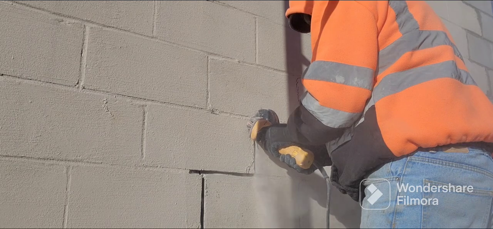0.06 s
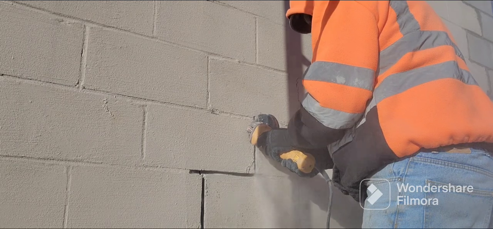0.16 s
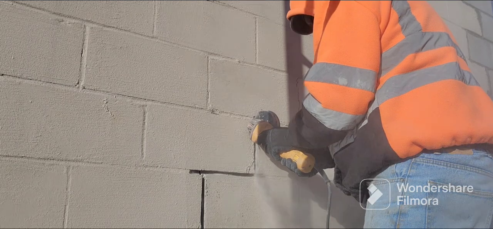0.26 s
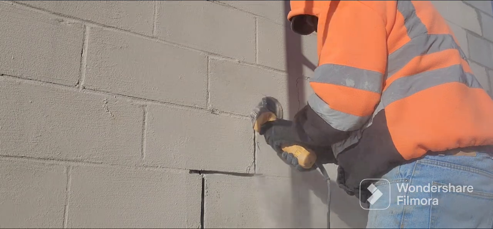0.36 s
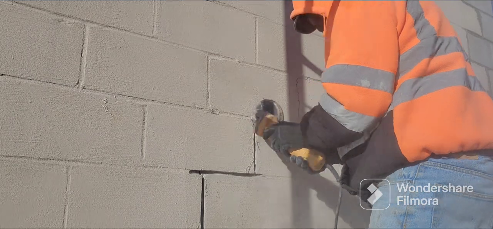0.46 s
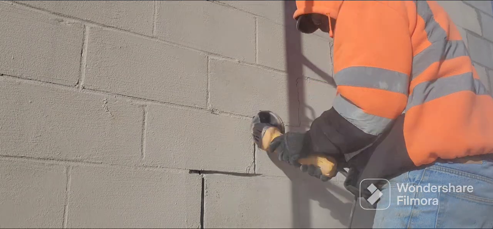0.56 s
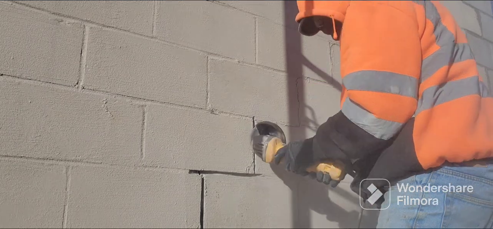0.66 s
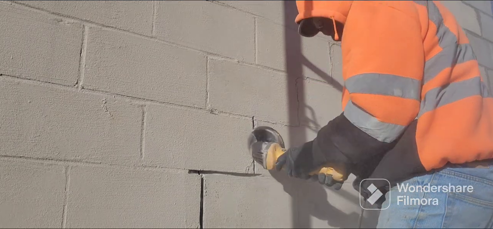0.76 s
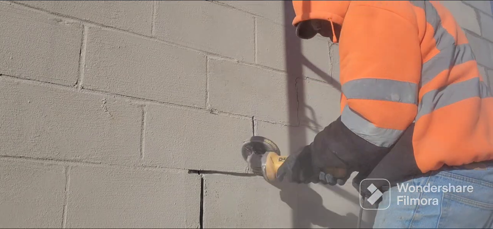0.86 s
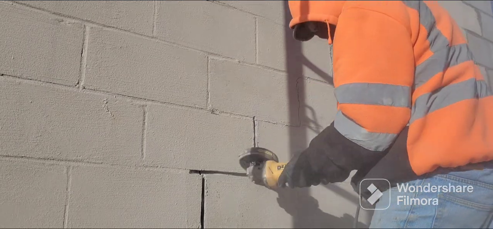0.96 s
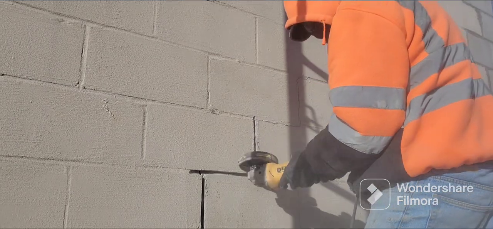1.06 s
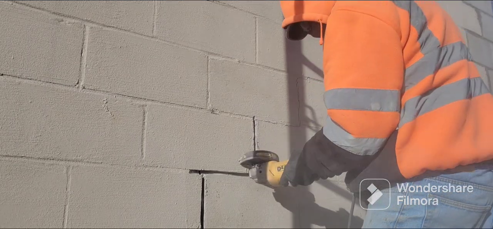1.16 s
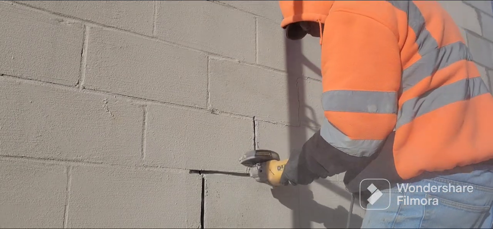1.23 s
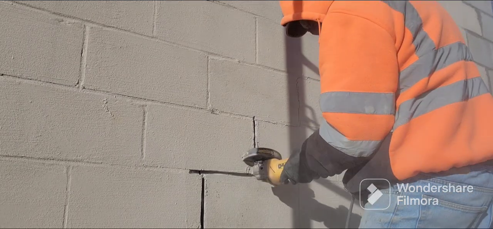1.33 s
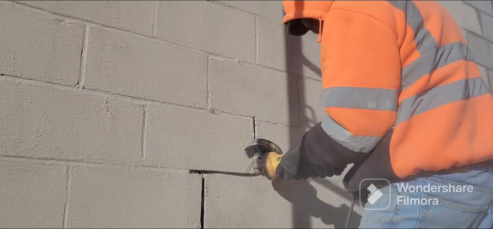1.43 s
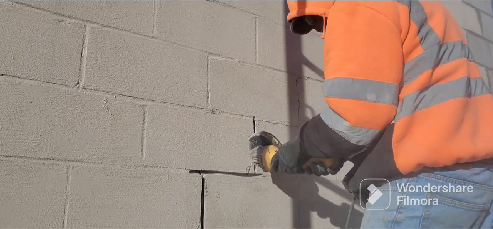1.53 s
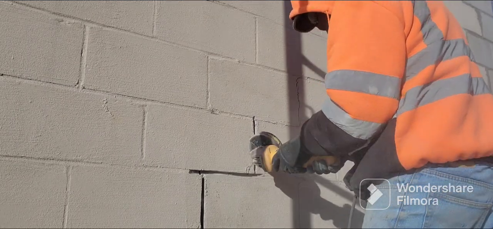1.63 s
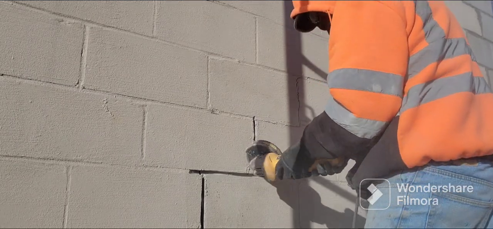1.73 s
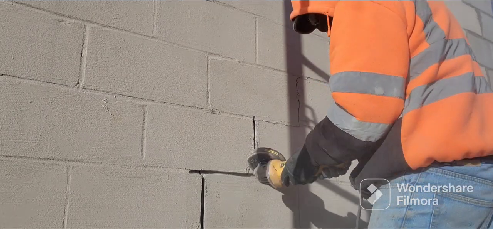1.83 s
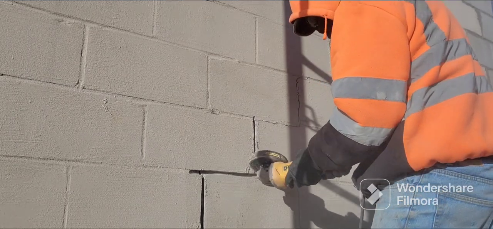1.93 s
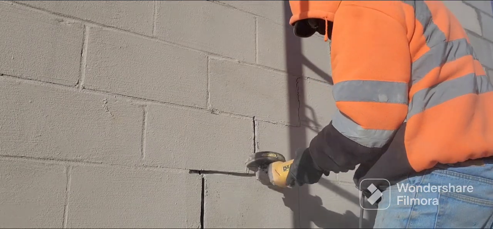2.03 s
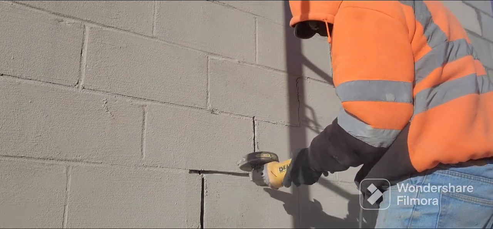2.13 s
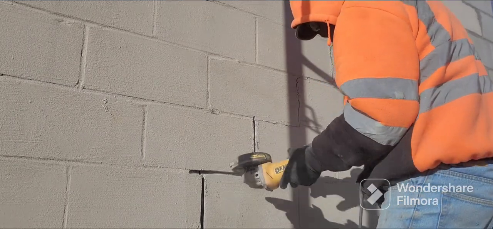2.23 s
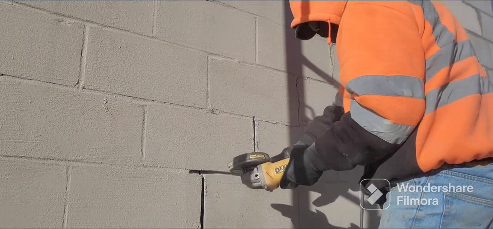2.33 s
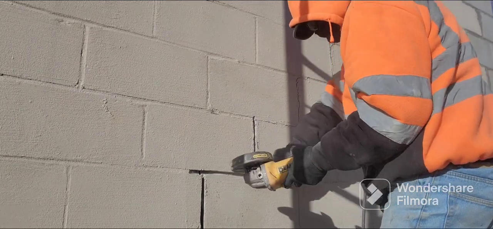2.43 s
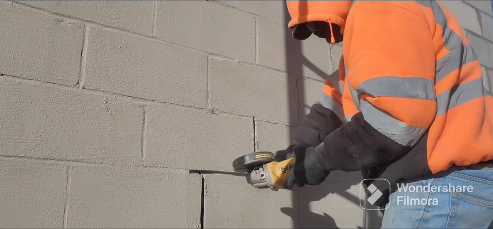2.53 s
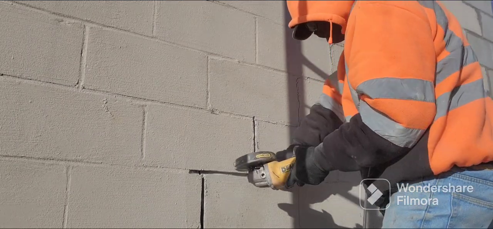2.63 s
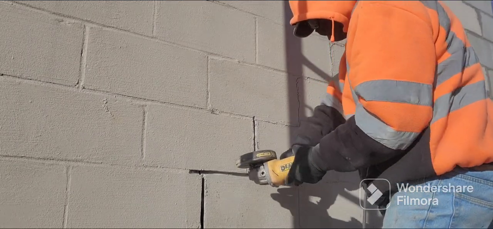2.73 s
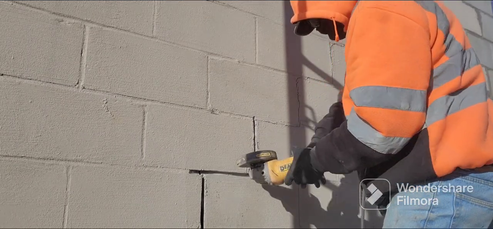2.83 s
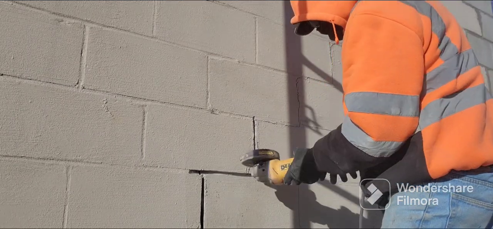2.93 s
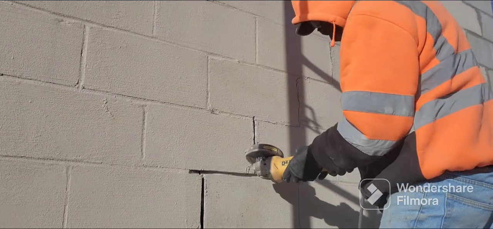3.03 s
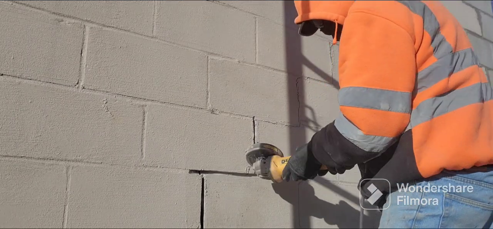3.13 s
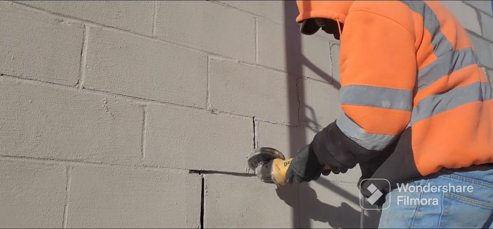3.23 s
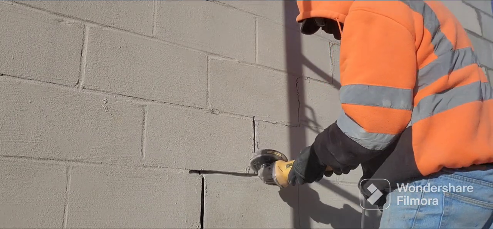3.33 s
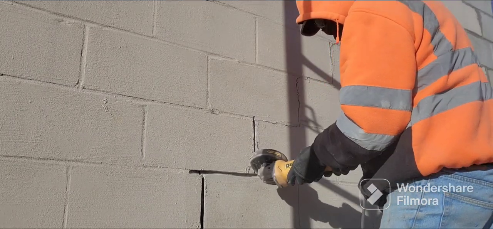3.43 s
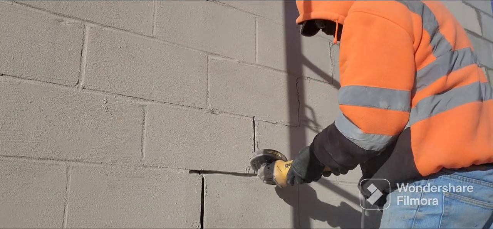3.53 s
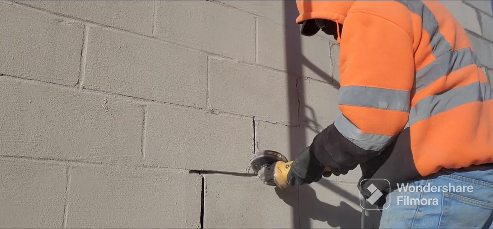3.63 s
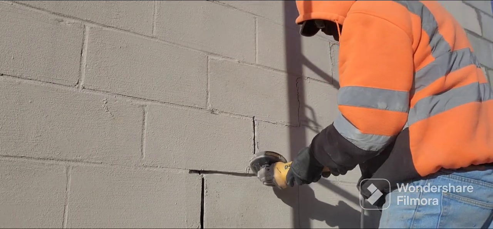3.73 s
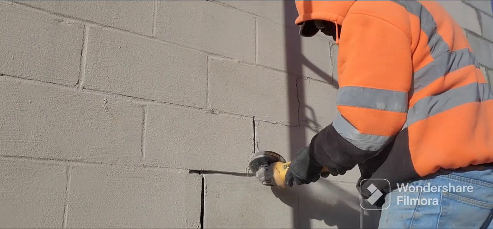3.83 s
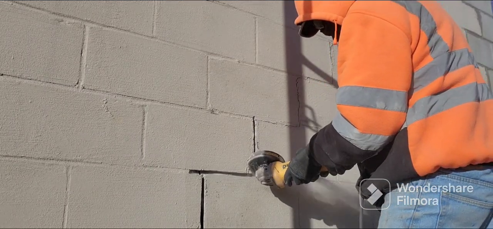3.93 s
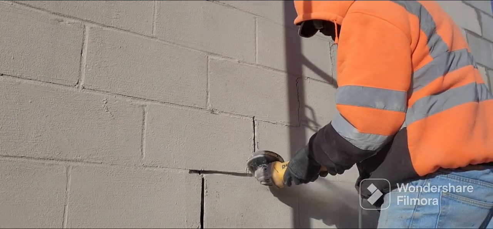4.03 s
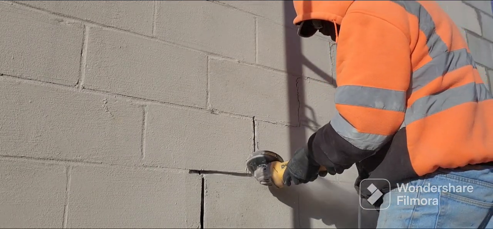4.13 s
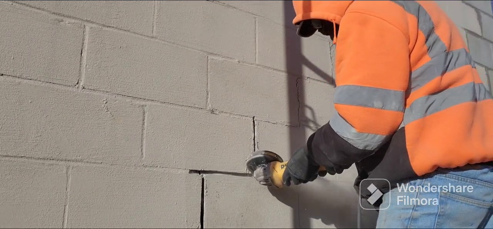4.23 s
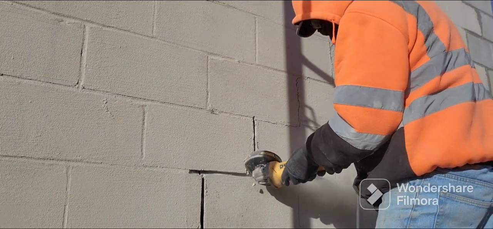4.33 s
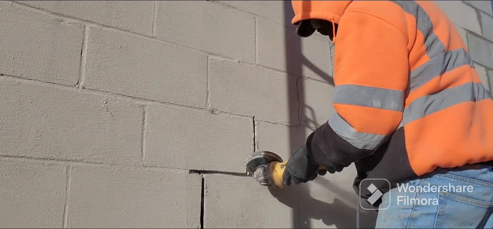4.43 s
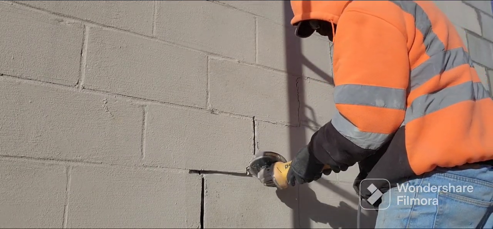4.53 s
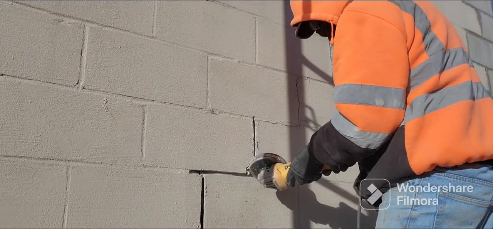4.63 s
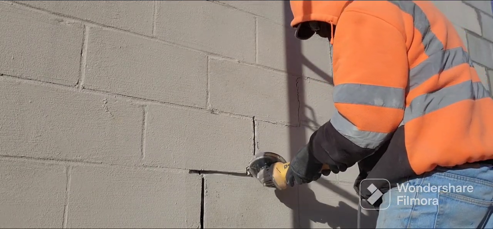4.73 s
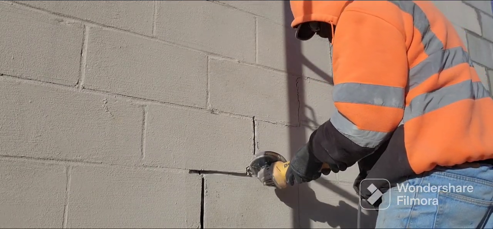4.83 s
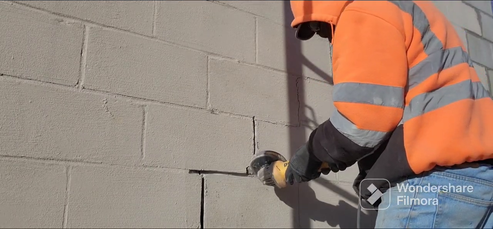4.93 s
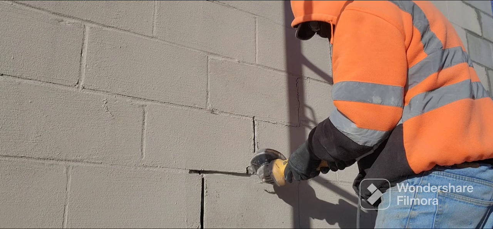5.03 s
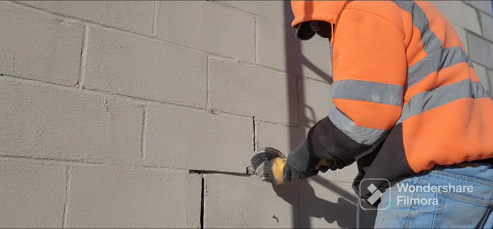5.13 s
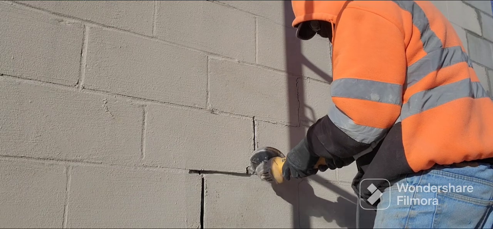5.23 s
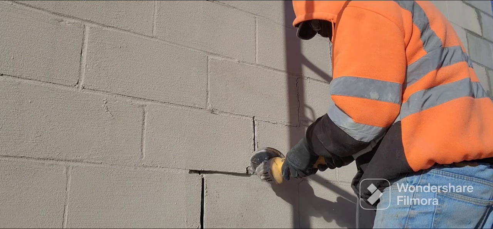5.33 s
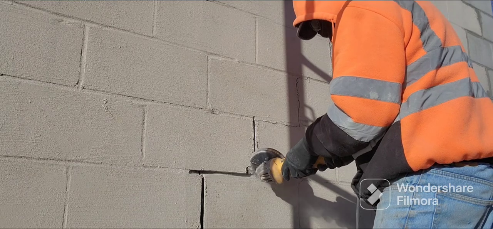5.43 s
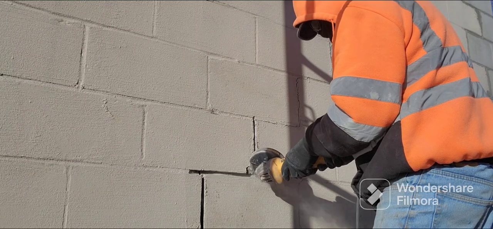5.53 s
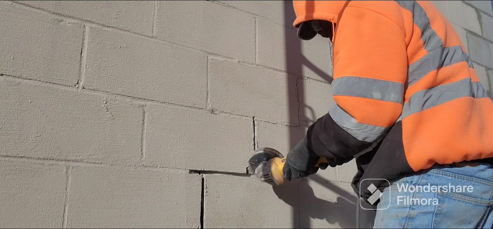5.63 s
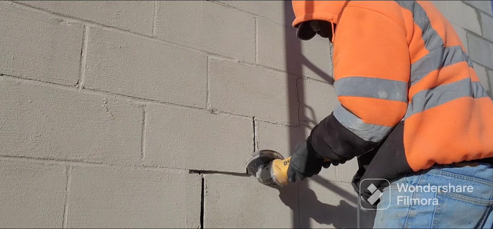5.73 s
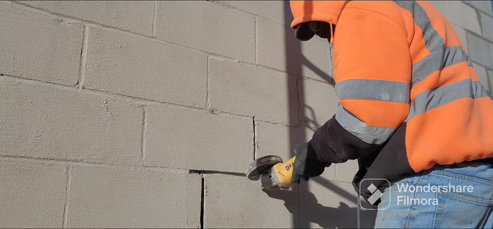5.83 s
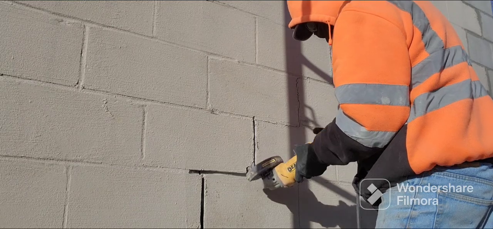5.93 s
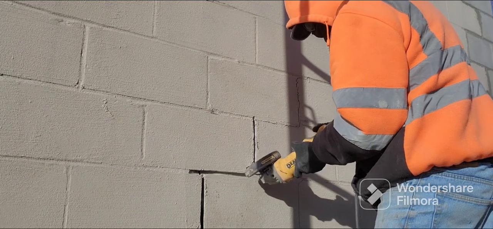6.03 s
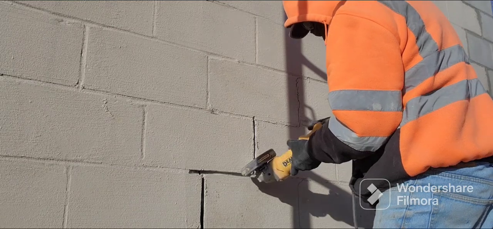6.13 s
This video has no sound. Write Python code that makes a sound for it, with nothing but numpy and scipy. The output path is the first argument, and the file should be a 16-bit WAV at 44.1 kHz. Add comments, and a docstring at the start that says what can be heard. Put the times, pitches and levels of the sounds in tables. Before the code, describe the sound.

Outdoors at a block wall, a phone's stereo microphones sit close to an angle grinder, with faint low site rumble beneath. From 0 s the disc is deep in mortar, hissing and ringing with growing pressure while the motor droops, thumping and droning, lowest around 0.5 s. It jams briefly, comes free with short chirps, then runs up steadily from 0.6 to about 2.3 s, fan roar, rattling gears and whine rising. Grazing scrapes appear from 1.2 s; from 1.9 to 3.9 s light rubs give a thin, wavering high squeal in short pulses. At 3.9 s it bites hard with bright ringing chirps and rasp, speed sagging until 4.55 s, then recovering with softer squeals. A shorter bite at 5.3-5.7 s barely slows it. Light squealing and grazing continue to the end around 6 s, the tool still running. A close wall echo shifts the roar's colour as the tool moves.

```python
"""Outdoors on a building site, at a block wall, with a phone's two microphone ports close to an angle grinder.
Over a low rumble the diamond disc starts deep in a mortar joint, and the motor bogs down.
Pulled free at half a second, it runs up again, grazing the slot and squealing in light rubs, then bites twice more.
Sources: noise coloured as site rumble and fan air (echoed off the wall), rattling gears, tones locked to the
spindle for the motor, disc modes for the squeal, and a grainy scrape that hisses and rings disc and guard."""
import sys
import numpy as np
from scipy import signal
from scipy.fft import rfft, irfft
from scipy.io import wavfile
from scipy.ndimage import map_coordinates

SR = 44100
rng = np.random.default_rng(int(sys.argv[2]) if len(sys.argv) > 2 else 0)


def bounce(signal):
    """Save signal as a 16-bit WAV file at the path given by the first command-line argument."""
    frames = np.transpose(np.atleast_2d(signal))
    limited = np.clip(frames, -1, 1)
    pcm = np.round(limited * 32767).astype(np.int16)
    wavfile.write(sys.argv[1], SR, pcm)


N = 271656
TIME = np.arange(N) / SR  # s
FREQ = np.maximum(np.arange(N // 2 + 1) * SR / N, 1)  # Hz

# Spectrum of the distant site rumble. Each row: frequency in Hz, relative density in dB.
SITE_SPECTRUM = [(33, 2), (45, 3.5), (65, 4.5), (110, -1), (190, -5), (260, -3), (400, -6), (1000, -58)]
SITE_DB = -43.34

# Echo path between tool and wall, longer as the motor swings away. Each row: time in seconds, delay in ms.
WALL_DELAY = [(0, 1.02), (.38, 1.23), (.52, 0.5), (.72, 0.65), (1.1, 0.82), (1.45, 0.53), (2.25, .7),
              (2.5, 1.09), (2.8, 1.13), (3.15, .6), (3.9, .5), (5.8, .52), (6.0, 0.68)]
WALL_ECHO = .36  # gain of the echo
VENT_DB_PER_MS = 2  # the vents roar louder when clear of the wall, per ms of echo delay

# Spindle speed, sagging under load. Each row: time in seconds, speed in turns per second [Hz].
SPINDLE_SPEED = [(0, 148), (.32, 142.5), (.42, 134), (.5, 123), (.56, 122), (.9, 144), (1.2, 153.2),
                 (1.55, 160), (2.3, 168.2), (3.3, 171.6), (4.0, 172.8), (4.3, 164), (4.55, 154.5),
                 (4.95, 163.2), (5.45, 167), (5.74, 165), (6.16, 168.2)]

# Spectrum of the cooling air. Each row: frequency in Hz, relative density in dB.
FAN_SPECTRUM = [(270, -19.5), (340, -11.5), (440, -14), (600, -19), (850, -7), (1150, -8), (1600, -4),
                (2000, 0.5), (2500, -2.5), (2930, -1), (3100, -10.5), (3750, -5.5), (4400, -14),
                (7000, -60)]
# Resonances of the gear case. Each row: frequency in Hz, width in Hz, relative level in dB.
GEAR_CASE_MODES = [(1140, 190, -6), (1760, 250, -1), (1938, 100, 2.5), (2170, 127, 6), (2660, 440, -0.5),
                   (2925, 120, 0.5)]
# Fan and gears against speed, before trims. One row: full-speed level in dB, loss at the slowest in dB, bend.
FAN_LAW = (-21, 8.9, 2.15)
# Fan and gears swell as the disc jams, just before it is pulled free: centre (s), length (s), level (dB)
JAM_S, JAM_LENGTH_S, JAM_DB = 0.473, 0.051, -19.5

# Whines of shaft, gears and commutator.
# Each row: multiple of the spindle speed, level at full speed in dB, left minus right in dB.
MOTOR_WHINES = [(1, -52, 0), (2, -53, 0), (44.9, -42, 4), (78.55, -35, 12)]
MOTOR_RATIO = 36 / 11  # motor turns per spindle turn
# Disc thumps under side load. Each row: centre in seconds, length in seconds, level of the once-a-turn tone in dB.
SIDE_THUMPS = [(0.167, 0.28, -42.5), (0.426, .14, -42.5), (4.397, 0.36, -44.5), (5.5, 0.44, -54)]

# Light rubs that squeal.
# Each row: start in seconds, length in seconds, level of the main tone in dB, level of the upper sideband in dB.
SQUEAL_RUBS = [(1.867, 0.17, -27, -32), (2.04, 0.17, -23.5, -45), (2.268, 0.12, -22, -32),
               (2.477, 0.077, -22, -35), (2.613, .15, -37, -30), (2.777, 0.11, -25.5, -39),
               (2.948, 0.058, -21, -31), (3.092, .18, -22, -31), (3.29, 0.31, -28, -29),
               (3.59, 0.11, -33, -28), (3.728, 0.17, -40, -26), (4.798, 0.25, -37, -28.5),
               (5.053, 0.25, -28, -29), (5.79, 0.24, -28, -30.5), (6.023, 0.17, -23, -48)]
SQUEAL_ATTACK_S, SQUEAL_RELEASE_S = 0.043, 0.085
SQUEAL_HZ, SQUEAL_HZ_PER_SPIN_HZ = 4685, 5.5  # pitch at full speed, and its slope with spindle speed
# Other disc modes sing as it catches or comes free.
# Each row: centre in seconds, length in seconds, pitch in Hz, level in dB.
DISC_CHIRPS = [(0.227, 0.18, 3675, -29), (0.555, 0.12, 3950, -27.5), (0.723, 0.062, 1860, -27.5),
               (3.975, 0.076, 5075, -23), (4.103, 0.087, 5170, -20), (5.35, 0.15, 5070, -30),
               (5.572, .08, 5075, -31), (5.684, 0.084, 5030, -27)]

# Spectrum of the grit hiss. Each row: frequency in Hz, relative density in dB.
GRIT_SPECTRUM = [(2500, -15), (3300, -1.5), (4100, 0), (4400, -18), (4650, 0.5), (5450, -7.5), (5750, -5),
                 (6700, -8), (8450, -4), (9100, -3.5), (11000, 0), (12700, 2), (13800, 4), (15800, 2)]
# Resonances of the steel disc. Each row: frequency in Hz, width in Hz, relative level in dB.
DISC_MODES = [(4560, 110, -4), (4875, 62, 4.5), (5114, 210, 1.5), (5280, 135, -0.5)]
# Resonances of the guard. Each row: frequency in Hz, width in Hz, relative level in dB.
GUARD_MODES = [(5780, 140, -2), (6260, 680, -5), (7190, 540, -2), (7730, 360, 2), (8270, 350, -5.5)]
# The disc is pushed into the joint; layer levels are mid-cut and before the trims in cutting().
# Each row: start in seconds, length in seconds, added bite 0-1, growth over the cut in dB, bearing drone in dB,
# grit hiss in dB, disc ring in dB, guard ring in dB.
JOINT_CUTS = [(-.06, 0.55, 0.06, 9.5, -35, -24, -31, -24.5), (3.904, 0.645, 0.4, -2, -60, -26, -25, -30.5),
              (5.29, 0.43, 0.4, 1, -31.5, -30, -28, -46)]
BITE_ATTACK_S, BITE_RELEASE_S, IDLE_BITE = 0.03, 0.043, .05
# The rim grazes the side of the slot; levels before the trims in cutting().
# Each row: centre in seconds, length in seconds, grit hiss in dB, disc ring in dB, guard ring in dB.
SLOT_GRAZES = [(0.373, .1, -29, -38, -30), (1.18, .14, -38, -37, -34), (1.47, 0.12, -38, -27, -40),
               (1.66, 0.081, -30, -42, -32), (1.826, 0.11, -25, -42, -30), (2.117, 0.088, -27, -44, -26),
               (2.633, 0.064, -40, -42, -24.5), (2.95, 0.19, -40, -41, -34), (3.037, 0.12, -30, -27, -36),
               (3.13, 0.084, -26, -36, -30), (3.43, 0.29, -36, -28, -29), (3.915, 0.22, -38, -26, -38),
               (4.097, 0.12, -33, -35, -29), (4.373, .07, -33, -26, -27), (5.364, 0.2, -30, -29, -29),
               (5.664, 0.09, -35, -23, -30), (5.877, .07, -38, -35, -24), (6.15, 0.25, -27, -46, -35)]
# Skimming between cuts, before trims: (full-speed level dB, loss at the slowest dB, bend of that law)
SKIM_GRIT, SKIM_DISC, SKIM_GUARD = (-25, 10, 1.47), (-29, 6.7, 1.6), (-27, 11, 1.9)
DEEPENING_DB_PER_S = .5  # the skimmed disc rings more as the slot deepens
GRAIN_DB = .8  # mean boost of a sand-grain burst

# Colour of the left microphone port. Each row: centre in Hz, width in Hz, boost in dB.
LEFT_PORT_BUMPS = [(2030, 360, 2), (1270, 1540, 1), (6480, 2500, 3), (3570, 110, -15.5), (11740, 1100, 1.5)]
# Colour of the right microphone port. Each row: centre in Hz, width in Hz, boost in dB.
RIGHT_PORT_BUMPS = [(2025, 550, -4), (6800, 1060, -3), (12190, 750, 9.5)]
# How alike noise is at the two ports. Each row: frequency in Hz, likeness 0-1.
PORT_LIKENESS = [(130, 0.91), (640, 0.94), (1400, 0.8), (3100, 1), (5000, 0.45), (7000, 0), (15000, 0.15)]
PORT_LAG = 2  # samples by which the right port hears later
TOP_HZ = 15750  # upper limit of the phone


def undb(db):
    """Decibels to gain."""
    return 10 ** (np.asarray(db) / 20)


def unit(x):
    """Scale to rms 1."""
    return x / np.sqrt(np.mean(x ** 2))


def curve(table):
    """The second column of a time table at every sample."""
    seconds, value = np.transpose(table)
    return np.interp(TIME, seconds, value)


def across(points):
    """A table of frequency and value, read at every frequency on a log scale."""
    hz, value = np.transpose(points)
    return np.interp(np.log(FREQ), np.log(hz), value)


def colour(x, points):
    """Give x a spectrum that falls away below its first point."""
    bass_cut = np.minimum(FREQ / points[0][0], 1) ** 2
    return unit(irfft(rfft(x) * undb(across(points)) * bass_cut, N))


def resonate(x, modes):
    """Ring a set of steep-sided resonances."""
    power = 0
    for hz, width, db in modes:
        power = power + undb(db) ** 2 / (1 + 2 * ((FREQ - hz) / width) ** 2) ** 2
    return unit(irfft(rfft(x) * np.sqrt(power), N))


def walk(rate, size=64):
    """Smooth chance that changes about rate times a second; spread 1."""
    count = N // size + 2
    smoothing = 1 + (FREQ[:count // 2 + 1] / rate) ** 2
    slow = irfft(rfft(rng.standard_normal(count)) / smoothing, count)
    return unit(np.interp(np.arange(N) / size, np.arange(count), slow))


def tone(hz, waver_hz, flicker_db):
    """A sine of rms 1 whose pitch and level waver."""
    phase = 2 * np.pi * np.cumsum(hz + waver_hz * walk(37.7)) / SR
    return unit(np.sin(phase) * undb(flicker_db * walk(33)))


def noise():
    """Noise at the two ports: alike in the bass, mostly unrelated in the treble."""
    likeness = across(PORT_LIKENESS)
    shared = rfft(rng.standard_normal(N))
    separate = rfft(rng.standard_normal((2, N)))
    return irfft(np.sqrt(likeness) * shared + np.sqrt(1 - likeness) * separate, N)


def sides(db):
    """Left and right gains for a level difference."""
    return undb(np.array([[db], [-db]]) / 2)


def swell(centre, length):
    """A smooth rise and fall around a centre in seconds."""
    return np.exp(-(2 * (TIME - centre) / length) ** 2)


def held(start, length, attack, release):
    """Rise, hold until start + length, then release."""
    rise = (TIME - start) / attack
    fall = 1 - (TIME - start - length) / release
    return np.clip(np.minimum(rise, fall), 0, 1)


def by_speed(spindle_hz, full_db, loss_db, bend):
    """Gain of a layer that fades as the motor bogs down."""
    bogged = (spindle_hz.max() - spindle_hz) / np.ptp(spindle_hz)
    return undb(full_db - loss_db * bogged ** bend)


def pressure(start, length, growth_db):
    """The hand pushes the disc in, changes its force steadily through the cut and lets go."""
    progress = np.clip((TIME - start) / length, 0, 1)
    return held(start, length, BITE_ATTACK_S, BITE_RELEASE_S) * undb(growth_db * (progress - .5))


def load():
    """How deep the disc bites (0-1) and how strongly the loaded bearing drones."""
    bite, drone_gain = IDLE_BITE, 0
    for start, length, depth, growth_db, drone_db, *_ in JOINT_CUTS:
        bite = bite + depth * held(start, length, BITE_ATTACK_S, BITE_RELEASE_S)
        drone_gain = drone_gain + undb(drone_db) * pressure(start, length, growth_db)
    return bite, drone_gain


def rim_pattern(turns, memory, slip, size=1024):
    """Worn teeth or a worn rim scrape nearly the same pattern every turn; it slips round and slowly changes."""
    fresh = rng.standard_normal((int(turns[-1]) + 2, size))
    carry = memory * np.exp(2j * np.pi * slip)  # each turn keeps part of the last, its phase shifted
    rows = signal.hilbert(fresh.ravel()).reshape(-1, size)
    pattern = signal.lfilter([1], [1, -carry], rows, axis=0).real.ravel()
    smooth = signal.sosfilt(signal.butter(8, 1 / 4, output="sos"), pattern)
    return unit(map_coordinates(smooth, [turns * size], order=1, mode="nearest"))


def site_rumble():
    """Low noise of the building site, drifting slightly in level."""
    return colour(noise(), SITE_SPECTRUM) * undb(SITE_DB + 0.41 * walk(6.6))


def fan_and_gears(turns, spindle_hz):
    """Cooling air roars and gears rattle in their case; the moving wall echo combs both."""
    air = colour(noise(), FAN_SPECTRUM) * undb(-0.67 + 0.57 * walk(19))
    clatter = rim_pattern(turns, memory=.82, slip=.2) + .6 * noise()
    gears = resonate(clatter, GEAR_CASE_MODES) * undb(-5.5 + 2.2 * walk(35))
    delay_ms = curve(WALL_DELAY)
    vent_gain = undb(VENT_DB_PER_MS * (delay_ms - delay_ms.mean()))
    running = by_speed(spindle_hz, *FAN_LAW) * vent_gain
    jam = undb(JAM_DB) * swell(JAM_S, JAM_LENGTH_S)
    roar = (air + gears) * np.hypot(running, jam)
    echo_time = TIME - delay_ms / 1000
    echo = np.array([np.interp(echo_time, TIME, side) for side in roar])
    return roar + WALL_ECHO * echo


def motor(spindle_hz, drone_gain):
    """Whines rise steeply with speed; side load makes the disc thump each turn and the bearing drone."""
    whine = 0
    for multiple, db, pan_db in MOTOR_WHINES:
        whine = whine + undb(db) * sides(pan_db) * tone(multiple * spindle_hz, multiple * .1, 2.5)
    thump_gain = sum(undb(db) * swell(centre, length) for centre, length, db in SIDE_THUMPS)
    once_a_turn = tone(spindle_hz, 0.97, 0.99)
    twice_a_turn = undb(-2.0) * tone(2 * spindle_hz, 3.2, 1.7)
    thump = thump_gain * (once_a_turn + twice_a_turn)
    drone = drone_gain * tone(3 * MOTOR_RATIO * spindle_hz, 10, 2.5)
    return whine * (spindle_hz / spindle_hz.max()) ** 6 + thump + drone


def squeal(spindle_hz):
    """Friction keeps one disc mode going; spin raises its pitch and adds sidebands. Other modes sing in passing."""
    hz = SQUEAL_HZ + SQUEAL_HZ_PER_SPIN_HZ * (spindle_hz - spindle_hz.max())
    mode = tone(hz, 9, 2.5) + undb(-19) * tone(hz + spindle_hz, 12, 3)
    upper_sideband = tone(hz + 2 * spindle_hz, 14, 3)
    sound = 0
    for start, length, db, sideband_db in SQUEAL_RUBS:
        rub = held(start, length, SQUEAL_ATTACK_S, SQUEAL_RELEASE_S)
        sound = sound + rub * (undb(db) * mode + undb(sideband_db) * upper_sideband)
    for centre, length, chirp_hz, db in DISC_CHIRPS:
        sound = sound + undb(db) * swell(centre, length) * tone(chirp_hz, 18, 2)
    return sound


def contact(spindle_hz):
    """Gains of grit, disc and guard: skimming follows the speed; cuts and grazes add their power to it."""
    grit, disc, guard = (by_speed(spindle_hz, *law) for law in (SKIM_GRIT, SKIM_DISC, SKIM_GUARD))
    deepening = undb(DEEPENING_DB_PER_S * (TIME - TIME.mean()))
    power = np.array([grit, disc * deepening, guard]) ** 2
    for start, length, _, growth_db, _, *layers_db in JOINT_CUTS:
        power = power + np.outer(undb(layers_db), pressure(start, length, growth_db)) ** 2
    for centre, length, *layers_db in SLOT_GRAZES:
        power = power + np.outer(undb(layers_db), swell(centre, length)) ** 2
    return np.sqrt(power)


def scrape(turns, bite, wobble, repeat):
    """Sand grains burst off the rim, in a surge once a turn; the deeper the bite, the more the scrape repeats."""
    bursts = np.repeat(rng.exponential(size=N // 16 + 1), 16)[:N]  # a new burst every 16 samples
    grains = unit(noise() * undb(GRAIN_DB * bursts))
    share = repeat * bite  # part of the power that repeats each turn
    repeating = rim_pattern(turns, memory=.92, slip=.4)
    force = np.sqrt(1 - share) * grains + np.sqrt(share) * repeating
    return force * (1 + wobble * bite * np.cos(2 * np.pi * turns))


def cutting(turns, spindle_hz, bite):
    """The scrape hisses off the mortar and rings the disc and its guard; the hand never presses evenly."""
    grit_gain, disc_gain, guard_gain = contact(spindle_hz)
    force = scrape(turns, bite, wobble=.12, repeat=.3)
    grit = colour(force, GRIT_SPECTRUM) * grit_gain * undb(5.0)
    # a deep bite drives the guard harder
    guard = resonate(force, GUARD_MODES) * guard_gain * undb(1.5 + 4.6 * bite + 1.55 * walk(17))
    rim_force = scrape(turns, bite, wobble=.15, repeat=1.1)
    disc = resonate(rim_force, DISC_MODES) * disc_gain * undb(1.0 + 0.62 * walk(25))
    return (grit + disc + guard) * undb(0.51 * walk(14))


def ports(x):
    """Each microphone port has its own resonances; the right one hears slightly later."""
    port_db = []
    for bumps in (LEFT_PORT_BUMPS, RIGHT_PORT_BUMPS):
        port_db.append(sum(db * np.exp(-2 * ((FREQ - hz) / width) ** 2) for hz, width, db in bumps))
    left, right = irfft(rfft(x) * undb(port_db), N)
    return np.array([left, np.roll(right, PORT_LAG)])


def scene():
    """The grinder at the wall, over the low rumble of the site, heard at the two ports."""
    spindle_hz = curve(SPINDLE_SPEED)
    turns = np.cumsum(spindle_hz) / SR
    bite, drone_gain = load()
    sound = site_rumble()
    sound = sound + fan_and_gears(turns, spindle_hz)
    sound = sound + motor(spindle_hz, drone_gain)
    sound = sound + squeal(spindle_hz)
    sound = sound + cutting(turns, spindle_hz, bite)
    return ports(sound)


def record(dry):
    """The phone cuts the top with a steep low-pass."""
    low_pass = signal.ellip(12, .1, 80, TOP_HZ, fs=SR, output="sos")
    return signal.sosfilt(low_pass, dry)


dry = scene()
out = record(dry)
bounce(out)
```